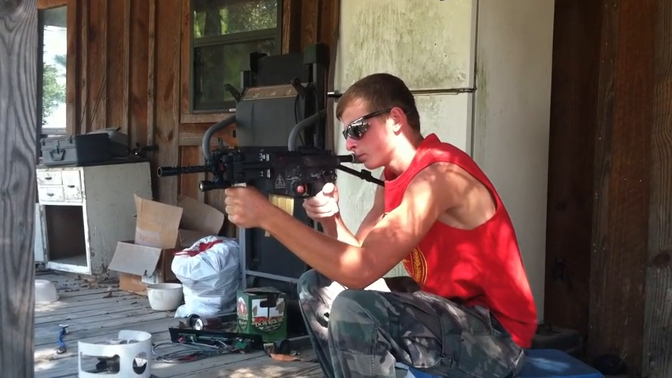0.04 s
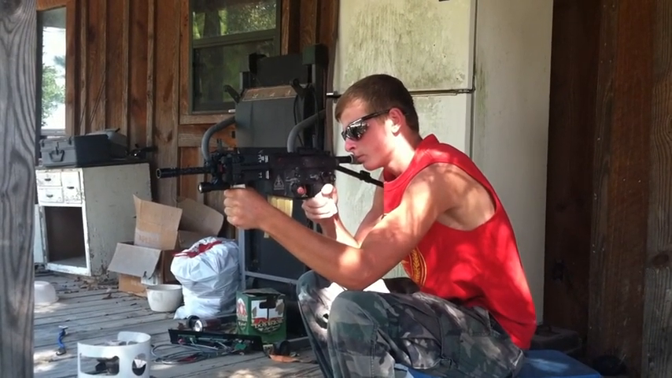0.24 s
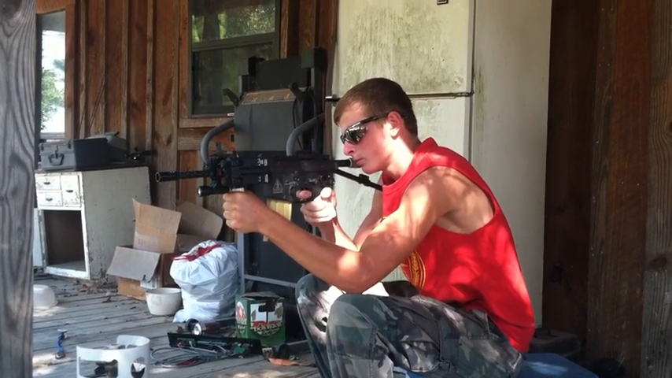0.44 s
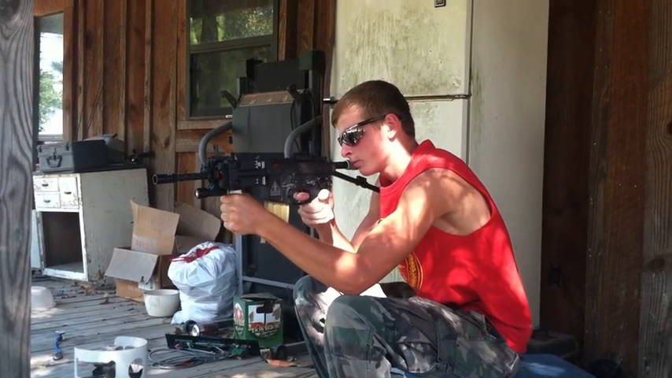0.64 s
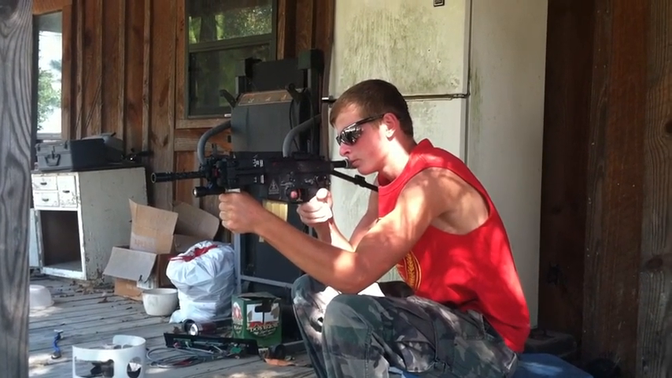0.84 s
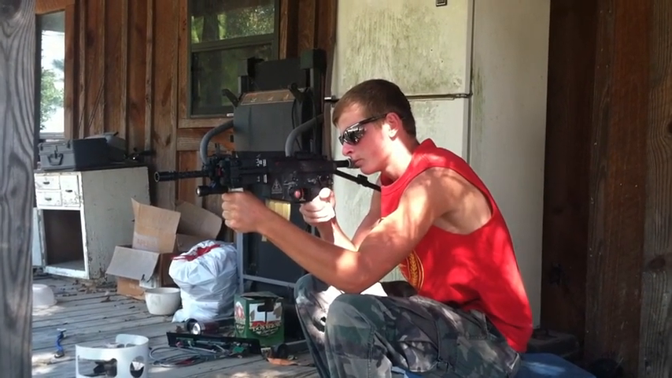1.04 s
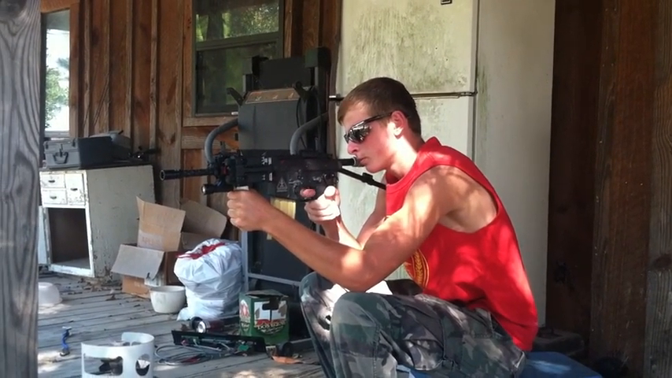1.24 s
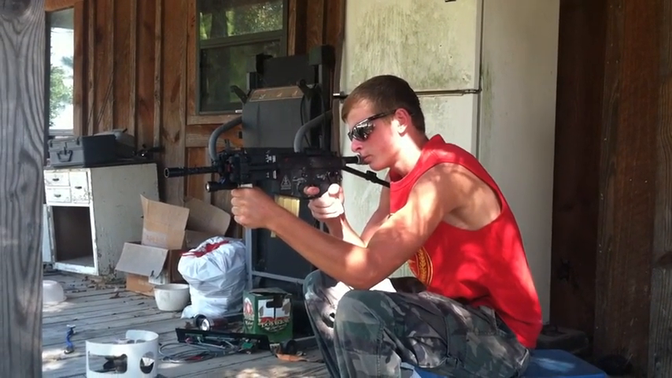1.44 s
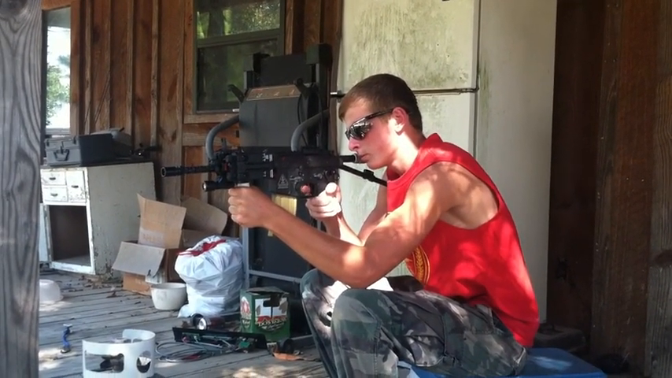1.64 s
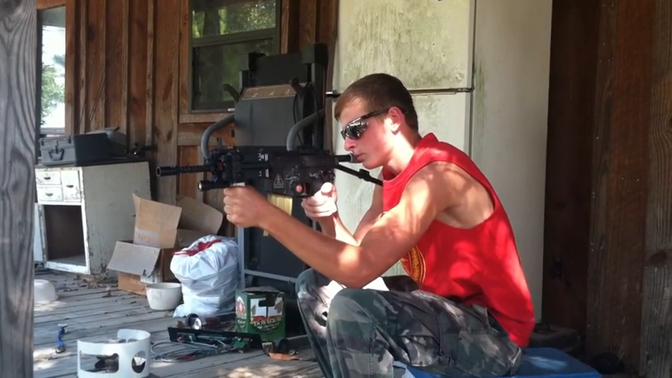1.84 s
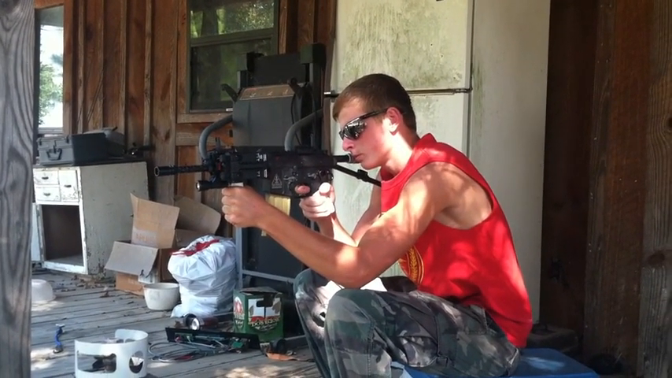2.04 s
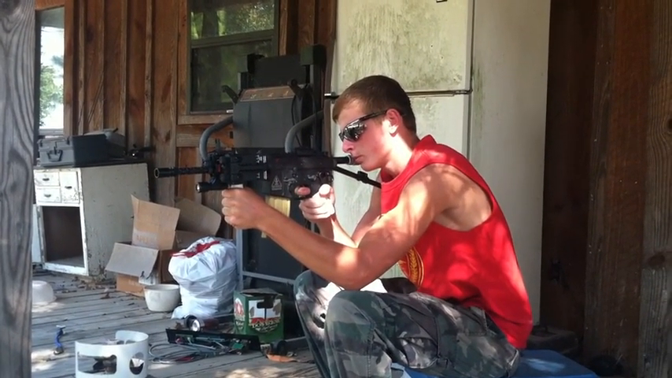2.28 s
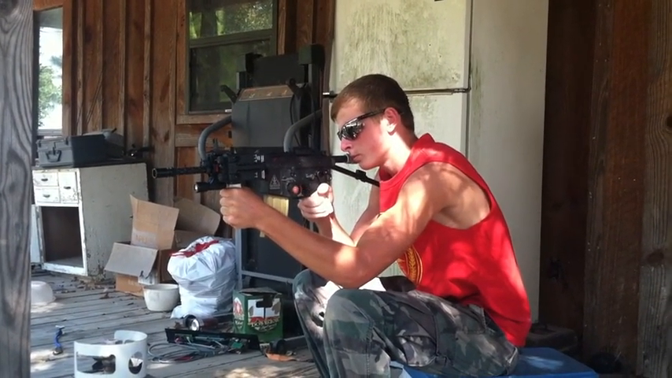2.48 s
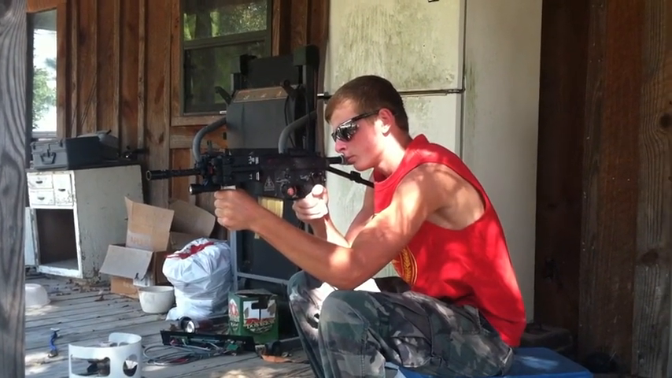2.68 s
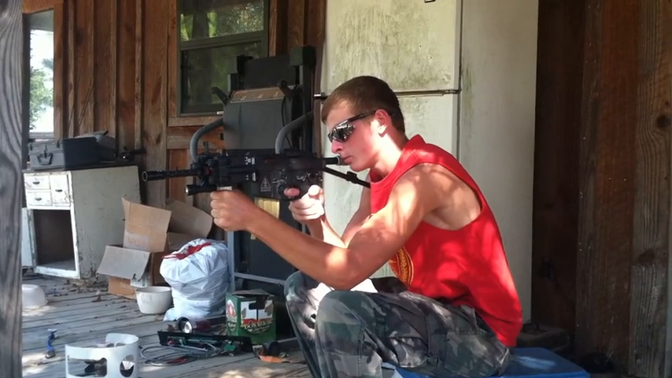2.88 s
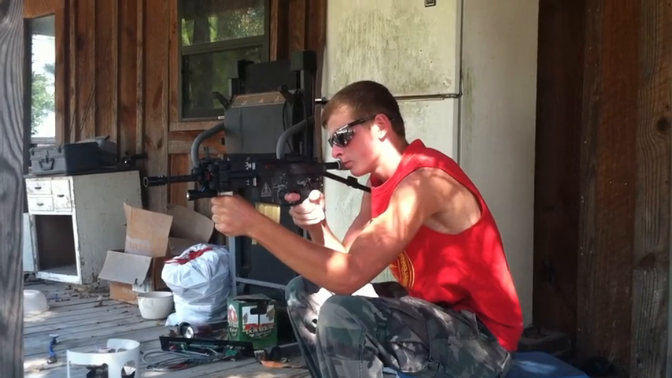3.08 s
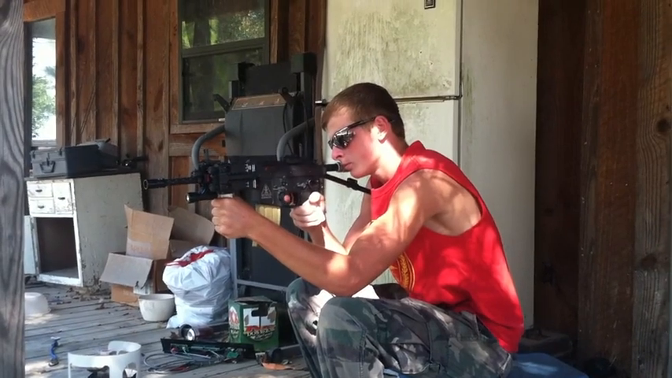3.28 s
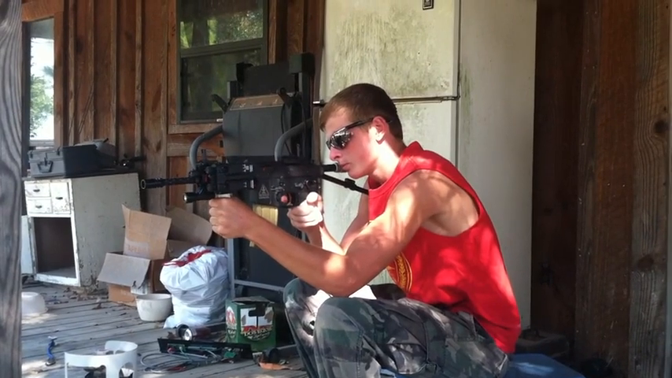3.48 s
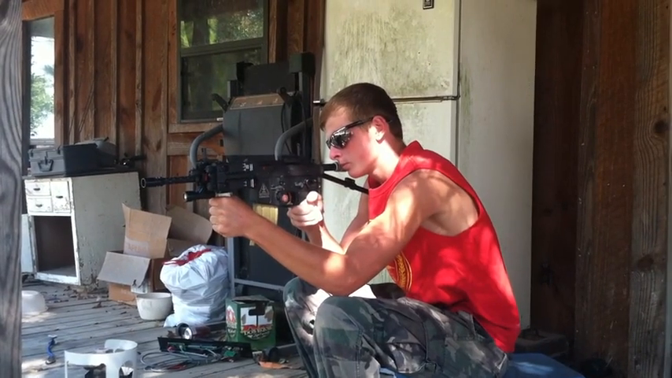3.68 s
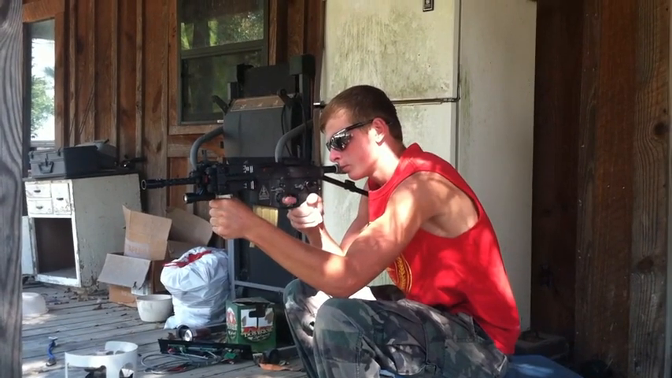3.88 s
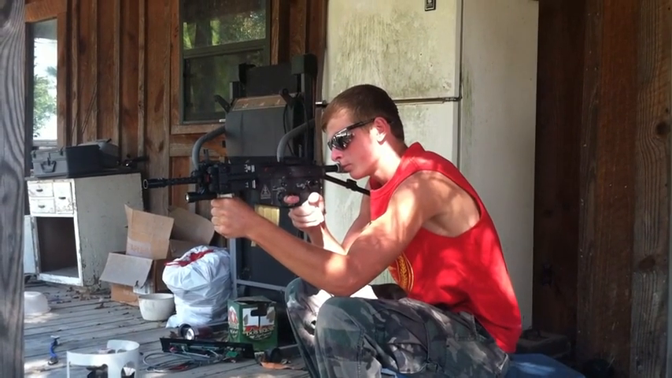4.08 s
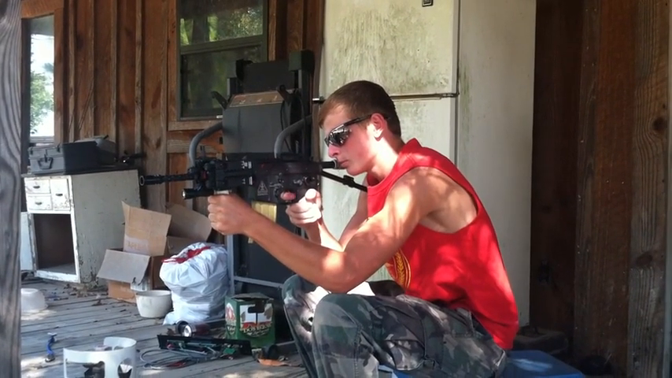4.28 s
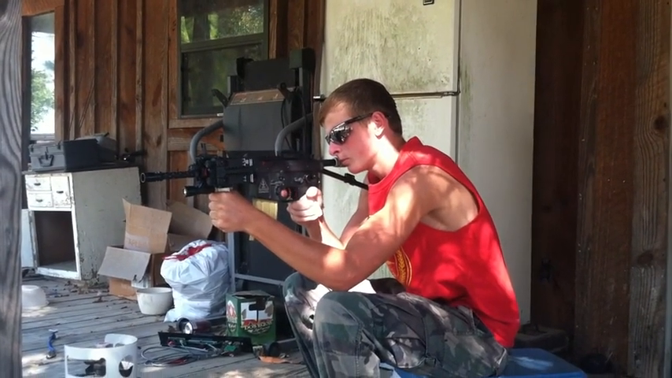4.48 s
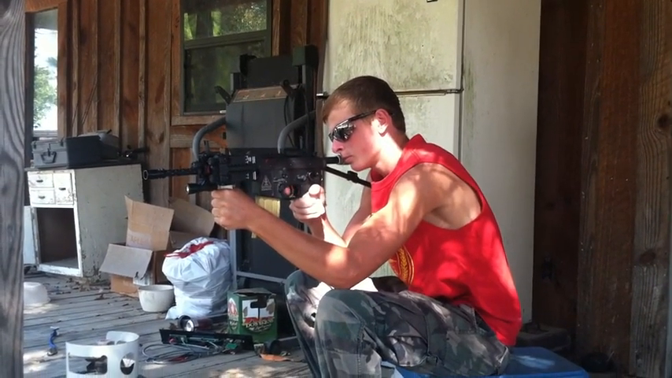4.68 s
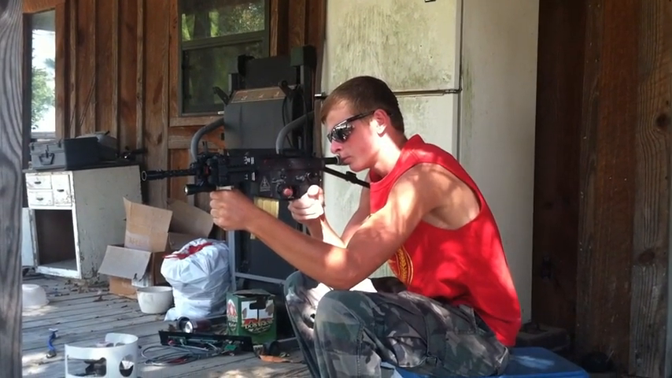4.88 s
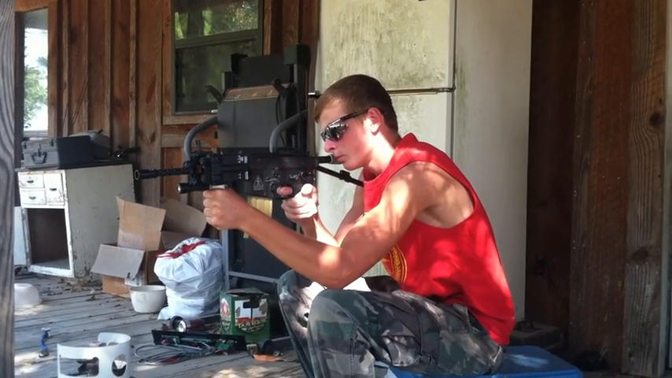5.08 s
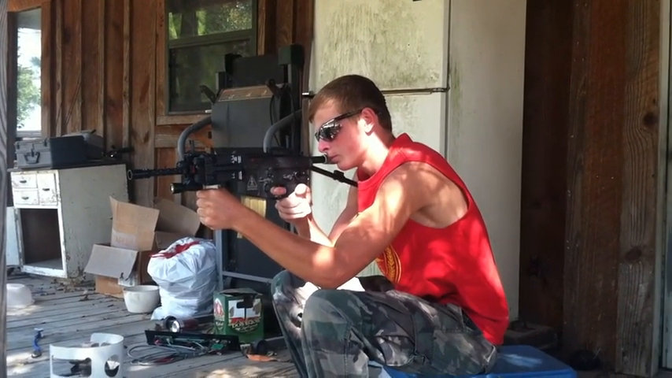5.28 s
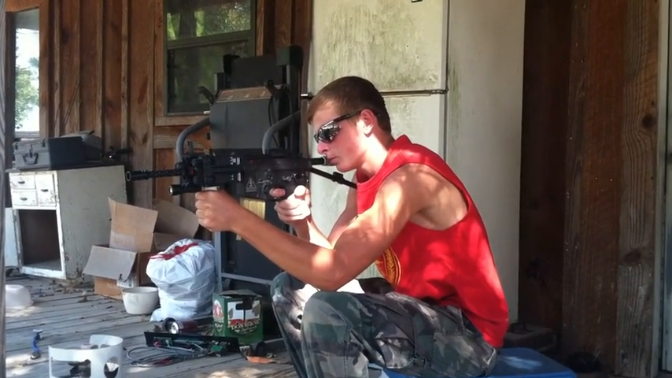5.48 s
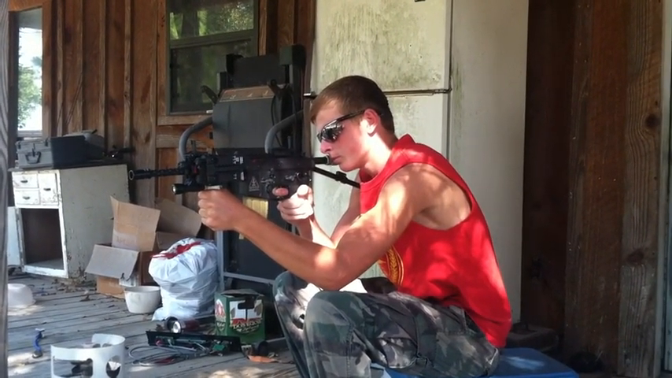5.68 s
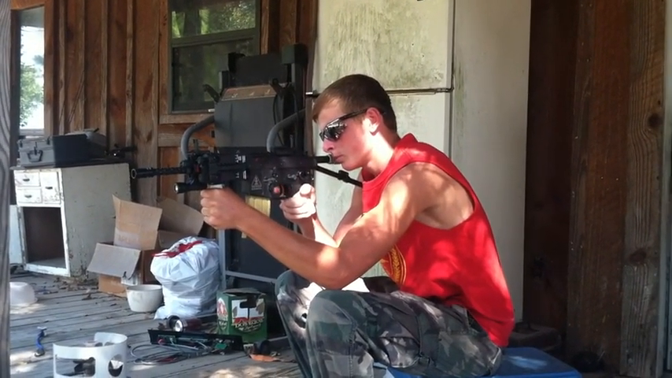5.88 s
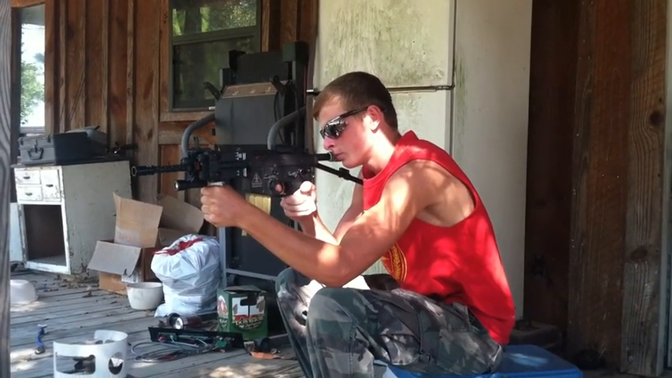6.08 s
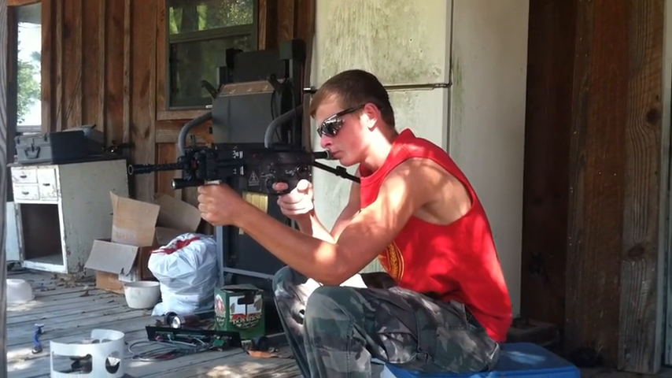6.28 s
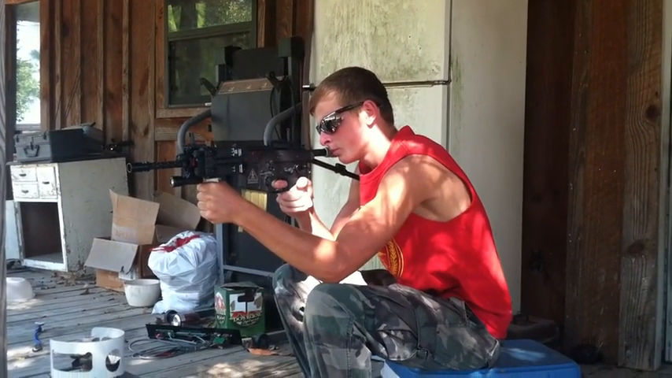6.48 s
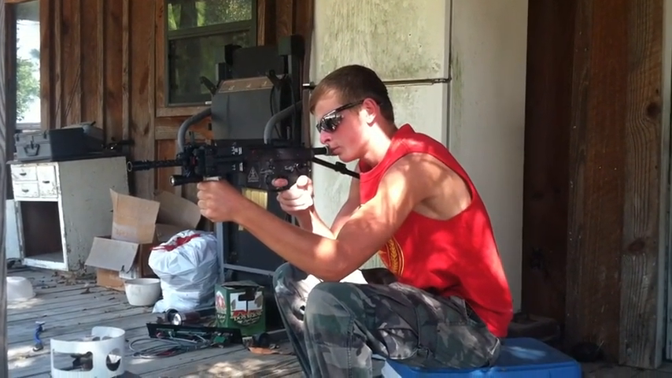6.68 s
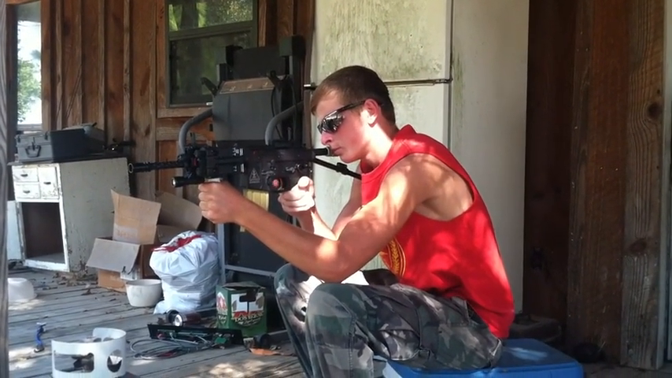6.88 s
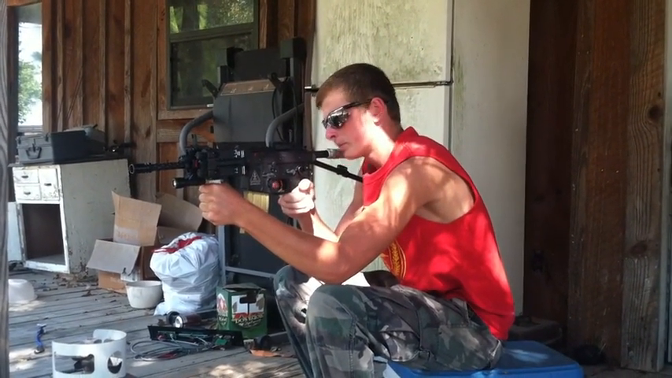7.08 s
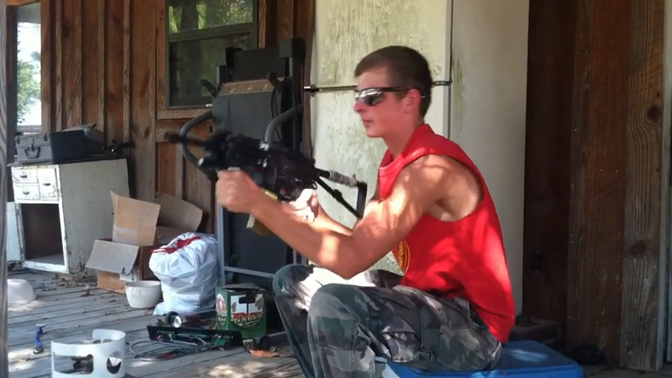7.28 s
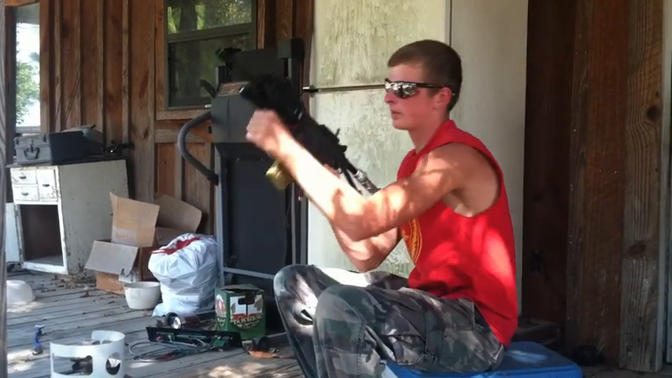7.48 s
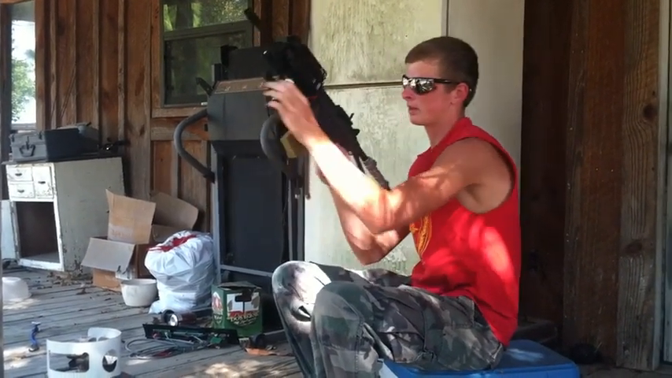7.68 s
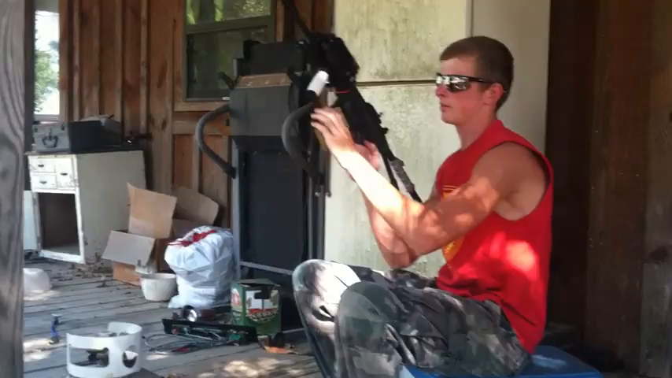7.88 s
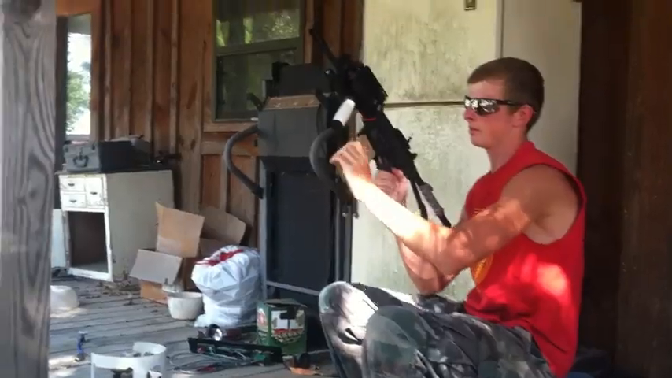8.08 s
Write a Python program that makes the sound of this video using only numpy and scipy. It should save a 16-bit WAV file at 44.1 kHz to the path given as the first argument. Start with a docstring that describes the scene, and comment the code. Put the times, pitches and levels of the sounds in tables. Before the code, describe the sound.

Close up on a wooden porch, an electric airsoft rifle fires eight rapid bursts of a few shots each, about twelve per second. Every shot is a dry mechanical crack with metallic rattle, ringing gearbox and small thump; a brief motor whirr leads each burst. Pellets tap a distant target a third of a second later. The final burst pops hollow, empty, then light plastic knocks and rubbing over a quiet yard hush.

```python
"""Electric airsoft rifle, close, firing full-auto bursts on a wooden porch: the piston cracks (filtered
impulses), the gearbox rattles and rings (noise, decaying sines), the spring thumps, the gears whine.
Distant pellets tap a target (noise bursts, decaying sines). The last four shots pop hollow: empty magazine.
The rifle is raised with knocks and rubs (noise bursts). Behind lies the hush of a yard (coloured noise).
A look-ahead limiter ducks the peaks."""
import sys
import numpy as np
from scipy import signal
from scipy.fft import rfft, irfft
from scipy.io import wavfile
from scipy.ndimage import uniform_filter1d, minimum_filter1d

SR = 44100
rng = np.random.default_rng(int(sys.argv[2]) if len(sys.argv) > 2 else 0)


def unload_wav(signal):
    """Save mono or channel-first audio to the path in sys.argv[1] as 16-bit WAV at rate SR, clipped to [-1, 1]."""
    wavfile.write(
        sys.argv[1],
        SR,
        np.round(np.clip(np.atleast_2d(signal).T, -1, 1) * 32767).astype(np.int16),
    )


N = 358964
TIME = np.arange(N) / SR

# trigger pulls: (motor start [s], first shot [s], first cycle [s], last shot [s], rattle [dB],
# extra rattle of first shot [dB], of last shot [dB], gears [dB], whine [dB], top whine pitch [Hz])
BURSTS = [(-.18, -.08, .091, .011, -3, 0, .5, -32, -30, 1460),
          (.48, .574, .089, .8326, -4.5, 7.5, 5, -34.5, -28.5, 1456),
          (1.306, 1.412, .0842, 1.657, -6.5, 3, 6.5, -30.5, -27, 1820),
          (2.141, 2.207, .0966, 2.4656, -3, 0, 0, -36, -41, 1475),
          (2.951, 3.041, .0908, 3.2975, -2, 0, 0, -31.5, -39, 1464),
          (3.996, 4.1, .0877, 4.349, -1.8, .5, -.5, -29, -25.5, 1533),
          (5.076, 5.159, .0919, 5.8175, -1.3, .5, 1.5, -32.3, -40, 1450),
          (6.354, 6.451, .0902, 6.8666, -1, 0, .5, -32, -30, 1392)]
CYCLE_S = .081  # one gearbox turn at full speed
EMPTY_FROM_S = 6.6  # shots after this have no pellet
# piston force, its spread from shot to shot, extra rattle without a pellet
STRIKE_DB, SHOT_SPREAD_DB, EMPTY_SHOT_DB = -1.46, 0.73, 1.5
# lesser contacts and early echoes of a shot: (time from piston strike [s], level re strike [dB])
CONTACTS = [(-.0018, -13.5), (.003, -12), (.0047, -11.5), (0.0115, -14), (0.0162, -12.5), (.0255, -19.5),
            (.0292, -23), (0.036, -21.5)]
# piston strike spectrum: (frequency [Hz], relative level [dB])
CRACK_SPECTRUM = [(60, -34), (300, -21), (650, -12.5), (1100, -16.5), (1700, -1.5), (2200, -2), (2850, 3.5),
                  (3700, -8.5), (4800, -13.5), (6600, -3.5), (9000, -6.5), (12000, -27), (14000, -21),
                  (16500, -42)]
# rattle spectrum: (frequency [Hz], relative level [dB])
RATTLE_SPECTRUM = [(60, -32.5), (160, -5.5), (260, -8), (450, -10.5), (600, -10), (860, -1.5), (1130, -11),
                   (1550, -1.5), (2400, 2.5), (3100, -0.5), (3800, -6), (6000, -2.5), (9000, -8),
                   (12000, -18), (16000, -45)]
# gearbox and barrel modes: (frequency [Hz], relative level [dB], t60 [s])
GEARBOX_MODES = [(904, -0.5, 0.2), (1860, 0, 0.13), (1720, -11.5, 0.14), (1920, -18, .2), (2294, -11, .2),
                 (2290, 3.5, 0.24), (2450, -16.5, .2), (2454, 12.5, 0.077), (2570, -17, .15),
                 (2950, -6.5, 0.47), (2960, 13, 0.14), (5100, -5.5, 0.13), (5830, -1, 0.13),
                 (5800, -9, .15)]
# recoil spectrum: (frequency [Hz], relative level [dB])
THUMP_SPECTRUM = [(25, -11), (70, -10.5), (130, -4), (200, 5), (320, -5), (450, 4), (900, -26),
                  (4000, -56.5)]
# hollow pop spectrum: (frequency [Hz], relative level [dB])
HOLLOW_SPECTRUM = [(60, -37), (200, -13.5), (400, -8.5), (560, -10.5), (780, -2.5), (1000, -4),
                   (1500, -21.5), (2500, -6), (3600, -14), (7000, -18), (16000, -36)]
# gear noise spectrum: (frequency [Hz], relative level [dB])
GEAR_SPECTRUM = [(60, -24), (250, -13), (580, -19), (880, 4.5), (1130, -6), (1500, 3.5), (2000, -1.5),
                 (2900, 2.5), (3800, -4.5), (5000, -8), (7500, -9), (10000, -11.5), (13000, -26),
                 (16000, -36)]
RUNNING_DB = -8.0  # gears at full speed, relative to the start from rest
# the gears squeal while winding, then slip with a snap
SLIP_S, SLIP_CRACK_DB, SLIP_RATTLE_DB = 1.3448, -15.5, -9
# pellets on the target, about a third of a second after their shots:
# (time [s], relative level [dB], relative treble [dB], relative knock [dB])
PELLET_HITS = [(.1965, -15, -25.5, -31), (.281, -17, -26, -33), (.363, -15.5, -29.5, -24),
               (.928, -19, -34, -26), (1.0135, -12, -18.5, -14), (1.762, -15, -18.5, -31),
               (1.85, -19.5, -26, -24), (2.007, -11, -20, -35), (2.56, -14.5, -19.5, -15),
               (2.656, -16, -27.5, -27), (2.735, -15, -26.5, -42), (2.817, -15.5, -20.5, -16),
               (3.655, -26, -13.5, -27.5), (4.46, -19, -18, -30), (4.619, -17, -30, -22),
               (5.94, -20, -19.5, -29.5), (6.005, -19, -19, -24), (6.0857, -13, -16, -27),
               (6.165, -16, -18.5, -24), (6.981, -25, -17.5, -22)]
# target tap spectrum: (frequency [Hz], relative level [dB])
TARGET_SPECTRUM = [(60, -23.5), (350, -7), (580, -9), (850, -3), (1200, -8), (1700, -3), (2500, 1),
                   (3700, -1), (6000, -2.5), (9500, -16.5), (12000, -32.5), (16000, -47)]
# hollow body of the target: (frequency [Hz], relative level [dB], t60 [s])
KNOCK_MODES = [(296, -4, .08), (365, -2, .08), (440, 1, 0.077), (550, -2, .06), (775, 1, 0.062),
               (930, -5, .06)]
PING_S = 1.016  # one pellet strikes metal
# the struck metal: (frequency [Hz], mean level [dB], t60 [s])
PING_MODES = [(825, -50, 0.22), (2454, -44, 0.2), (3286, -39, .26), (3300, -41, .22), (4970, -34, 0.2)]
# handling knocks and rubs: (time [s], relative level [dB], rise constant [s], decay constant [s], centre [Hz])
HANDLING_EVENTS = [(7.167, -36, 0.0013, 0.0038, 1000), (7.201, -59.5, 0.22, 0.41, 7900),
                   (7.328, -34.5, .003, 0.0036, 8000), (7.572, -42.5, 0.016, 0.031, 5650),
                   (7.72, -54.5, .004, 0.012, 8000), (7.984, -45, 0.0026, 0.0072, 5000),
                   (7.997, -26, 0.00083, 0.0051, 8200), (7.997, -35.5, 0.00072, 0.016, 2800)]
# porch and yard reverberation: (frequency [Hz], t60 [s])
PORCH_T60 = [(150, 0.11), (900, 0.42), (2500, 0.38), (6000, 0.31), (12000, 0.25)]
# outdoor background spectrum: (frequency [Hz], relative level [dB])
YARD_SPECTRUM = [(15, -38), (25, -29), (53, -29), (84, -23), (134, -4), (476, -5.5), (641, -15), (840, -8),
                 (988, -13.5), (1070, -15), (1520, -18), (2350, -20), (9840, -37.5), (12500, -50),
                 (16000, -78.5)]
# outdoor background: (time [s], level [dB])
YARD_LEVEL = [(0, -48.5), (5, -47.5), (7.15, -49), (7.5, -46), (8.14, -43.5)]
CUTOFF_HZ = 16500


def shot_times(first_s, first_cycle_s, last_s):
    """Slow first cycle as the motor gathers speed, then even shots; the last falls as it coasts."""
    second_s = first_s + first_cycle_s
    even_count = round((last_s - second_s) / CYCLE_S)
    return np.r_[first_s, second_s + CYCLE_S * np.arange(even_count), last_s]


def fire():
    """Every piston strike, as rows (time [s], crack [dB], rattle [dB]); force varies from shot to shot."""
    shots = []
    for _, first_s, first_cycle_s, last_s, rattle_db, first_db, last_db, *_ in BURSTS:
        for s in shot_times(first_s, first_cycle_s, last_s):
            force_db = rng.normal(0, SHOT_SPREAD_DB)
            extra_db = first_db * (s == first_s) + last_db * (s == last_s)
            extra_db += EMPTY_SHOT_DB * (s > EMPTY_FROM_S)
            shots.append((s, STRIKE_DB + force_db, rattle_db + force_db + extra_db))
    return np.array(shots)


def cracks(strikes, rebound_cut_hz=4500):
    """The piston strikes sharply; duller contacts follow at nearly the same delays each cycle."""
    s, crack_db, _ = strikes.T
    rebounds = np.zeros(N)
    for lag_s, db in CONTACTS:
        times = s + lag_s + rng.normal(0, .00008, len(s))
        rebounds += clicks(times, crack_db + db + rng.normal(0, 1.5, len(s)))
    hits = clicks(s, crack_db) + band(rebounds, 74, rebound_cut_hz)
    # the casing smears each strike over a few swings: all-pass, started 10 samples early
    _, a = signal.iirpeak(3000, .9, fs=SR)
    smeared = signal.lfilter(a[::-1], a, np.roll(hits, -10))
    return from_db(19.5) * colour(smeared, CRACK_SPECTRUM)


def rattle(strikes, shake_db=10.0, loose_db=10.0, wash_db=11.3, ring_db=7.5):
    """Each strike shakes the rifle, rings the gearbox and fills the porch, partly alike every time."""
    noise, ring = np.zeros(N), np.zeros(N)
    alike = unit_energy(burst(rise_s=0.0006, decay_s=0.0073))
    usual_wash, *washes = porch(count=len(strikes) + 1)
    for (s, _, db), wash in zip(strikes, washes):
        loose = unit_energy(burst(rise_s=0.0028, decay_s=0.012))
        add(noise, s - .002, from_db(db + shake_db) * alike)
        add(noise, s - .006, from_db(db + loose_db) * loose)
        add(noise, s, from_db(db + wash_db) * (.65 * usual_wash + .76 * wash))
        add(ring, s, from_db(db + ring_db) * unit_energy(ringing(GEARBOX_MODES)))
    return colour(noise, RATTLE_SPECTRUM) + ring


def spring(s, thump_db=-2.0, surge_s=.0108, surge_db=-5.0, loss_db=6.5, spread_db=1.2):
    """The rifle recoils with a thump; the released spring surges to and fro, weaker each time."""
    db = thump_db + rng.normal(0, spread_db, len(s))
    thumps = clicks(s + 0.003, db)
    for k in range(1, 5):
        thumps += clicks(s + 0.00838 + k * surge_s, db + surge_db - loss_db * k)
    return colour(thumps, THUMP_SPECTRUM)


def empty_barrel(times, pop_db=11.0, air_db=-0.5, puff_db=-2.0, puff_low_hz=70, puff_high_hz=800):
    """With no pellet to stop it, air leaves the barrel in a hollow pop; the first adds a deep puff."""
    pops, puff = np.zeros(N), np.zeros(N)
    empty = times[times > EMPTY_FROM_S]
    for s in empty:
        add(pops, s - .0004, [1])
        add(pops, s, from_db(air_db) * unit_energy(burst(rise_s=0.00056, decay_s=0.0078)))
    deep = band(burst(rise_s=.002, decay_s=.016), puff_low_hz, puff_high_hz)
    add(puff, empty[0], from_db(puff_db) * unit_energy(deep))
    return from_db(pop_db) * colour(pops, HOLLOW_SPECTRUM) + puff


def motor(spin_up_s=0.018, sag=.17, overtone_db=-7.0, pinion=1.46, pinion_db=-10.0):
    """Gear noise pulses at mesh rate, slower as the spring tightens; the start is louder and whines."""
    gears, whine = np.zeros(N), np.zeros(N)
    for start_s, first_s, first_cycle_s, last_s, *_, gear_db, whine_db, top_hz in BURSTS:
        marks = np.r_[start_s, shot_times(first_s, first_cycle_s, last_s)]
        for k, (begin_s, end_s) in enumerate(zip(marks, marks[1:])):
            t = TIME[:round((end_s - begin_s) * SR)]
            wound = t / t[-1]
            effort = (1 - np.exp(-t / spin_up_s)) * from_db(RUNNING_DB * (k > 0))
            mesh_hz = top_hz * (1 - sag * (2 * wound - 1.25) ** 2)
            rough_hz = mesh_hz * (1 + 0.18 * rng.standard_normal(len(t)))
            phase = 2 * np.pi * np.cumsum(rough_hz) / SR
            grind = rng.standard_normal(len(t)) * (1 + 0.55 * np.cos(phase))
            add(gears, begin_s, from_db(gear_db) * effort * grind)
            if k == 0:
                # the faster pinion sings first, the main gear as it takes the load
                main = np.sin(phase) + from_db(overtone_db) * np.sin(2 * phase)
                main = main * np.exp(-((wound - .66) / 0.33) ** 2)
                small = from_db(pinion_db) * np.sin(pinion * phase) * np.exp(-((wound - .35) / .2) ** 2)
                add(whine, begin_s, from_db(whine_db) * effort * (main + small))
    return colour(gears, GEAR_SPECTRUM) + whine


def squeal(hz=1520, db=-24.0, swell_s=0.032, decay_s=.007, rough=0.698, scrape_db=-2.5):
    """Straining teeth squeal and scrape louder and louder until they slip."""
    t = TIME - SLIP_S
    strain = np.clip(1 + t / swell_s, 0, 1) * np.exp(-np.clip(t / decay_s, 0, 20))
    phase = 2 * np.pi * np.cumsum(hz * (1 + rough * rng.standard_normal(N))) / SR
    scrape = band(rng.standard_normal(N), 4000, 10300)
    return from_db(db) * strain * (np.sin(phase) + from_db(scrape_db) * scrape)


def pellets(echo_s=0.018, echo_db=-2.5, tick_db=17.0, treble_db=23.0, tap_db=-8.5, knock_db=-9.5,
            ring_db=-21.0, ring_s=0.012, ring_hz=2450, ring_spread=0.0787):
    """Tick, tap and echo from the distant target; each hit has its own brightness, knock and ring."""
    taps, body, t = np.zeros(N), np.zeros(N), TIME[:12000]
    for s, db, hit_treble_db, hit_knock_db in PELLET_HITS:
        for lag_s, lag_db, decay_s in ((0, 0, .004), (echo_s, echo_db, .008)):
            tap = burst(rise_s=0.00068, decay_s=decay_s)
            add(tap, .001, [from_db(tick_db)])
            treble = from_db(hit_treble_db + treble_db) * band(tap, 7400, 13700)
            add(taps, s + lag_s, from_db(db + lag_db) * (band(tap, 210, 3300) + treble))
        hz = ring_hz * np.exp(rng.normal(0, ring_spread))
        add(body, s, from_db(db + ring_db) * np.exp(-t / ring_s) * np.sin(2 * np.pi * hz * t))
        add(body, s, from_db(db + hit_knock_db + knock_db) * ringing(KNOCK_MODES))
    add(body, PING_S, ringing(PING_MODES))
    return from_db(tap_db) * colour(taps, TARGET_SPECTRUM) + body


def handling(top_hz=11000, body_db=-2.5, grain_db=4.0):
    """Plastic parts knock, and hands and cloth slide in small catches, as the rifle is raised."""
    out = np.zeros(N)
    for s, db, rise_s, decay_s, hz in HANDLING_EVENTS:
        bright = band(burst(rise_s, decay_s, size=44100), hz / 1.29, hz * 1.26)
        dull = band(burst(rise_s, decay_s, size=44100), hz / 5, hz / 1.7)
        # narrower bands pass less noise: make up the level
        add(out, s, from_db(db) * np.sqrt(SR / hz) * (bright + from_db(body_db) * dull))
    catches = uniform_filter1d(rng.standard_normal(N), size=200)
    grip = from_db(grain_db * catches / catches.std())
    low_pass = signal.butter(6, min(top_hz, SR / 3), fs=SR, output="sos")
    return signal.sosfilt(low_pass, out * grip / np.sqrt(np.mean(grip ** 2)))


def porch(count, build_s=0.0021, lumpy_db=8.5, blend_s=0.056, size=18000):
    """Responses of boards, walls and roof, one a row: separate echoes blend into a tail, t60 by band."""
    t, tail = TIME[:size], 0
    edges_hz = np.geomspace(60, 19000, 9)
    white = rng.standard_normal((2, count, size))
    for k, (low_hz, high_hz) in enumerate(zip(edges_hz, edges_hz[1:])):
        t60_s = at_hz(PORCH_T60, np.sqrt(low_hz * high_hz))
        tail = tail + band(white[k % 2], low_hz, high_hz) * from_db(-60 * t / t60_s)
    lumps = uniform_filter1d(rng.standard_normal((count, size)), size=70)
    echoes = from_db(lumpy_db * np.tanh(lumps / lumps.std()) * np.exp(-t / blend_s))
    # unit energy over all rows, times sqrt(count): about 1 a row
    return np.sqrt(count) * unit_energy(tail * echoes * (1 - np.exp(-t / build_s)))


def yard():
    """Outdoor hush: coloured noise with a slowly drifting level."""
    level_db = np.interp(TIME, *np.transpose(YARD_LEVEL))
    return colour(rng.standard_normal(N), YARD_SPECTRUM) * from_db(level_db)


def from_db(db):
    """Decibels to gain."""
    return 10 ** (np.asarray(db) / 20)


def unit_energy(x):
    """Scale to a total energy of 1."""
    return x / np.sqrt(np.sum(x ** 2) + 1e-20)


def at_hz(points, hz):
    """Read a table on a log-frequency axis."""
    table_hz, values = np.array(points).T
    return np.interp(np.log(np.maximum(hz, 1)), np.log(table_hz), values)


def add(out, s, sound):
    """Mix a sound in at time s, cut at the ends."""
    start = round(s * SR)
    low, high = max(start, 0), min(start + len(sound), len(out))
    if high > low:
        out[low:high] += sound[low - start:high - start]


def through(x, response):
    """Pass a sound through an impulse response."""
    return signal.fftconvolve(x, response)[:len(x)]


def band(x, low_hz, high_hz):
    """Keep one band of frequencies."""
    band_pass = signal.butter(2, [low_hz, min(high_hz, SR * 9 / 20)], "band", fs=SR, output="sos")
    return signal.sosfilt(band_pass, x)


def colour(x, spectrum, size=4096):
    """Causal (minimum-phase) filter with the given spectrum; white noise keeps its level."""
    gains = from_db(at_hz(spectrum, np.arange(size // 2 + 1) * SR / size))
    cepstrum = irfft(np.log(gains))
    # fold the cepstrum onto positive time
    fold = 1 + np.sign(size // 2 - np.arange(size))
    fold[0] = 1
    return through(x, unit_energy(irfft(np.exp(rfft(cepstrum * fold)))))


def clicks(times, db):
    """One impulse at each time, at its level."""
    out = np.zeros(N)
    for s, gain in zip(times, from_db(db)):
        add(out, s, [gain])
    return out


def burst(rise_s, decay_s, size=12000):
    """Noise that swells and dies away; rms 1 at its top."""
    t = TIME[:size]
    shape = (1 - np.exp(-t / rise_s)) * np.exp(-t / decay_s)
    return shape / shape.max() * rng.standard_normal(size)


def ringing(modes, spread_db=2.5, size=16000):
    """Decaying sines; every blow excites each mode a little differently."""
    t, out = TIME[:size], np.zeros(size)
    for hz, db, t60_s in modes:
        decay = from_db(db + rng.normal(0, spread_db) - 60 * t / t60_s)
        out += decay * np.sin(2 * np.pi * (hz * t + rng.random()))
    return out


def scene():
    """Rifle, target and hands, direct and off the porch, over the hush of the yard."""
    shots = fire()
    shot_s = shots[:, 0]
    strikes = np.vstack([shots, (SLIP_S, SLIP_CRACK_DB, SLIP_RATTLE_DB)])
    pop, gears, taps, hands = empty_barrel(shot_s), motor() + squeal(), pellets(), handling()
    direct = cracks(strikes) + rattle(strikes) + spring(shot_s) + pop + gears + taps + hands
    sent = from_db(-10) * pop + from_db(-6.5) * gears + from_db(-4.0) * taps + from_db(-9.5) * hands
    return (direct + through(sent, porch(count=1)[0]) + yard())[None]


def record(dry, ceiling_db=-0.5, attack_db_per_s=426.0, release_db_per_s=209.0):
    """A look-ahead limiter ducks ahead of each peak and recovers after it; a low-pass cuts the top."""
    over_db = np.maximum(20 * np.log10(np.abs(dry[0]) + 1e-9) - ceiling_db, 0)
    release, attack = release_db_per_s * TIME, attack_db_per_s * TIME
    after = np.maximum.accumulate(over_db + release) - release
    before = np.maximum.accumulate((over_db - attack)[::-1])[::-1] + attack
    held_db = minimum_filter1d(-np.maximum(before, after), size=441)
    gain_db = uniform_filter1d(held_db, size=441)
    low_pass = signal.cheby2(16, 60, CUTOFF_HZ, fs=SR, output="sos")
    return signal.sosfilt(low_pass, dry * from_db(gain_db))


dry = scene()
out = record(dry)
unload_wav(out)
```